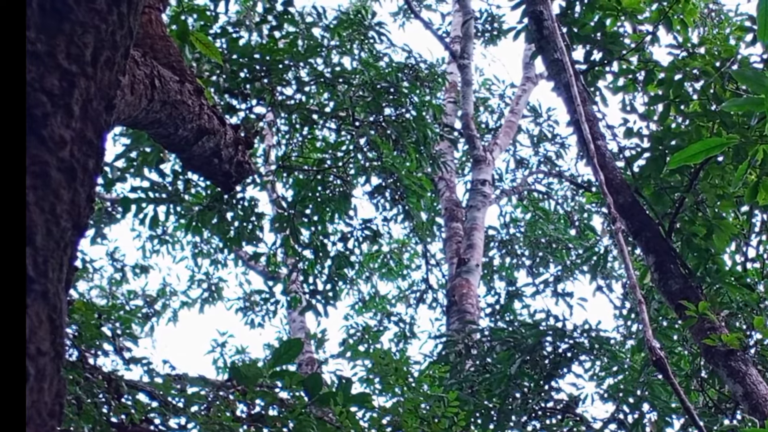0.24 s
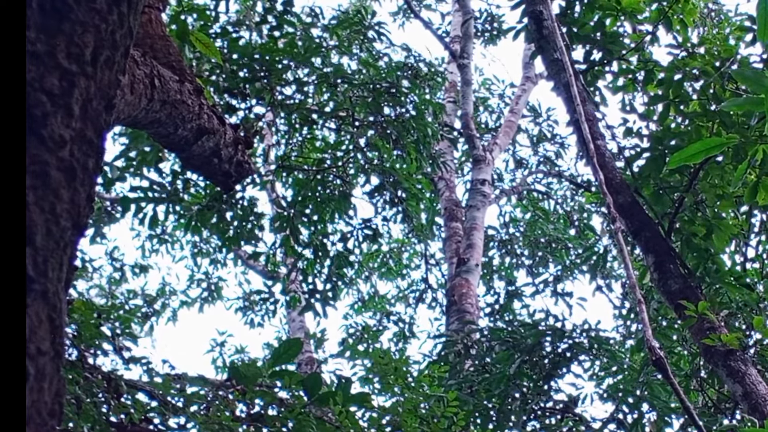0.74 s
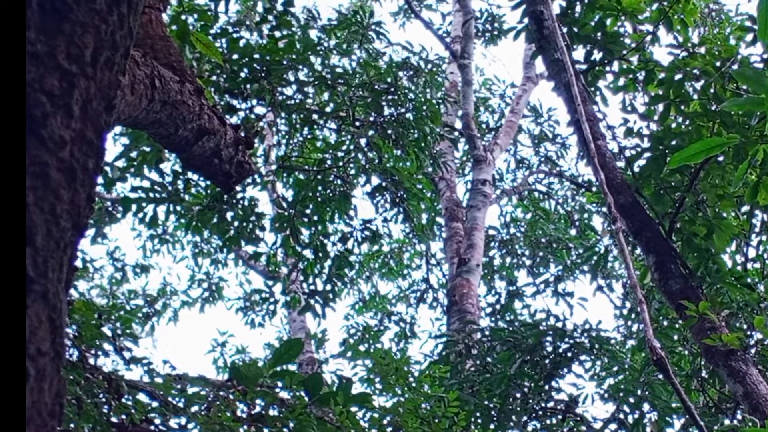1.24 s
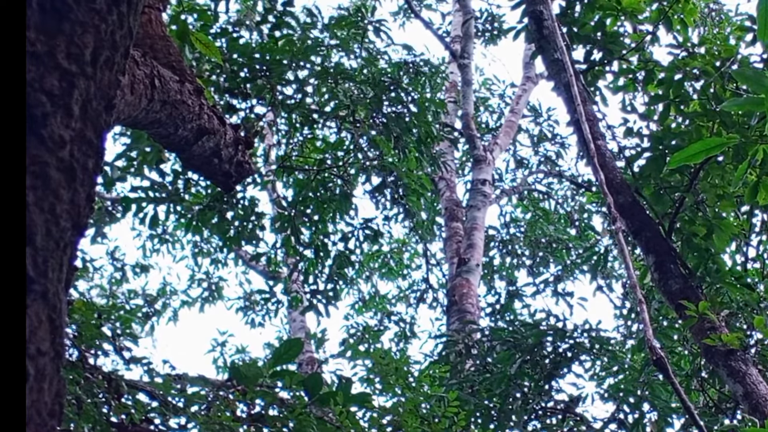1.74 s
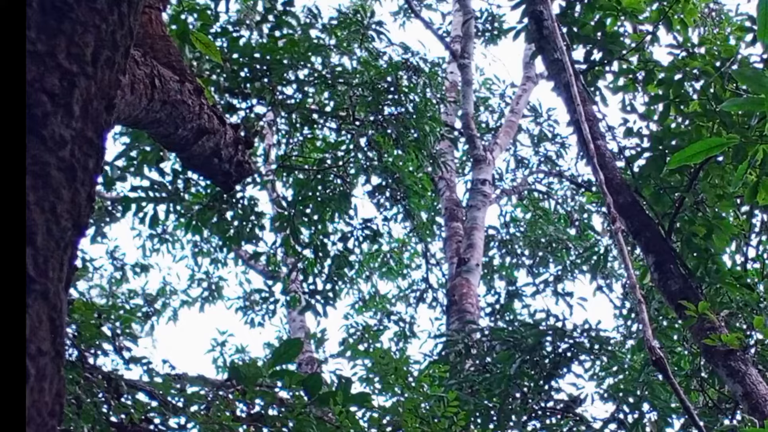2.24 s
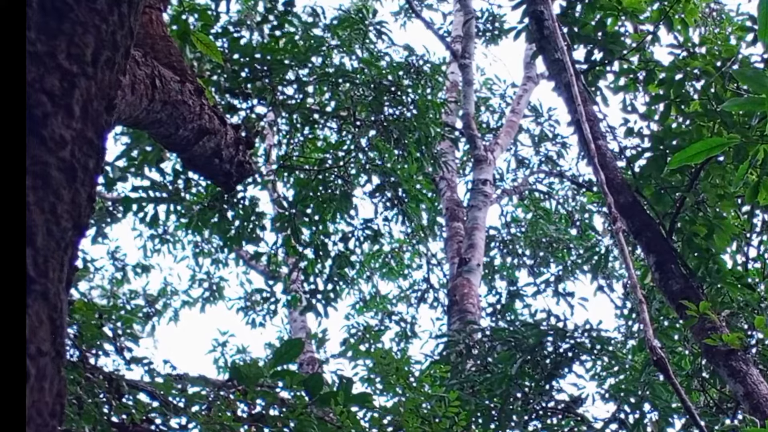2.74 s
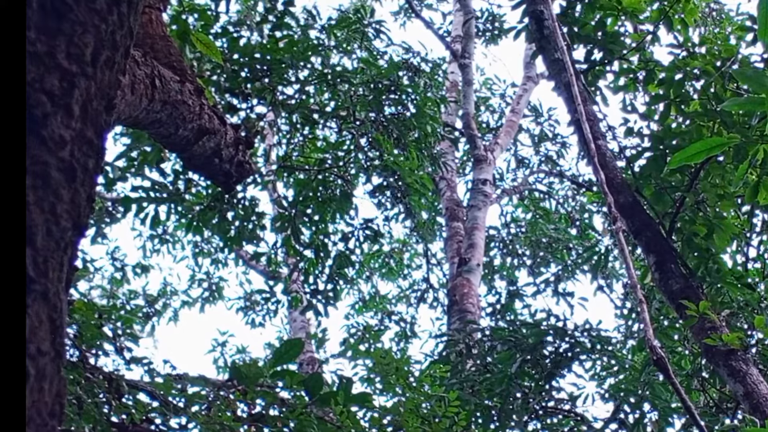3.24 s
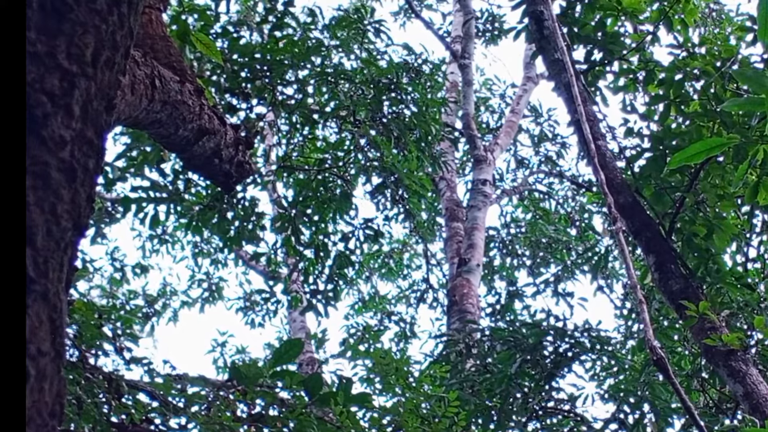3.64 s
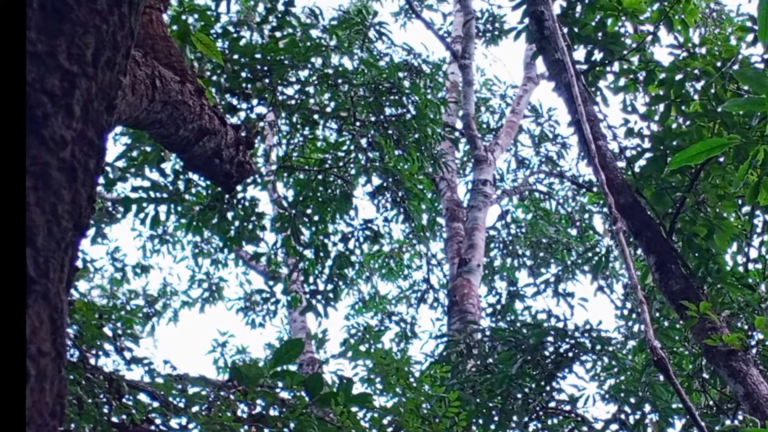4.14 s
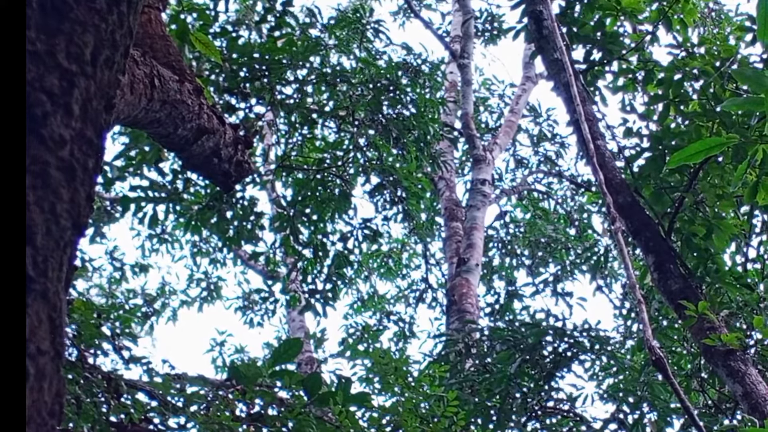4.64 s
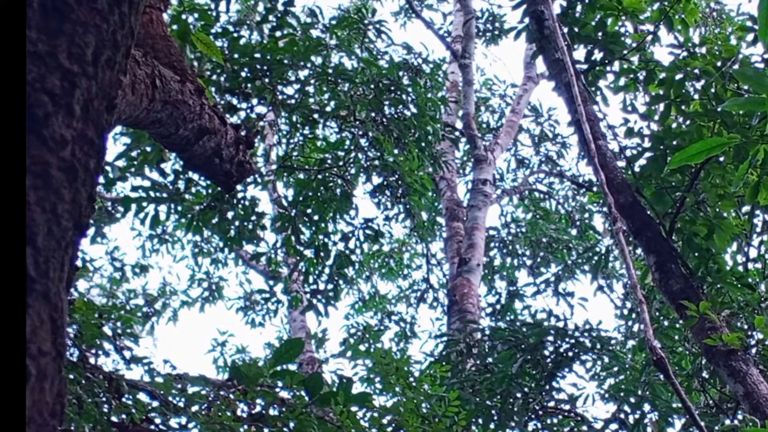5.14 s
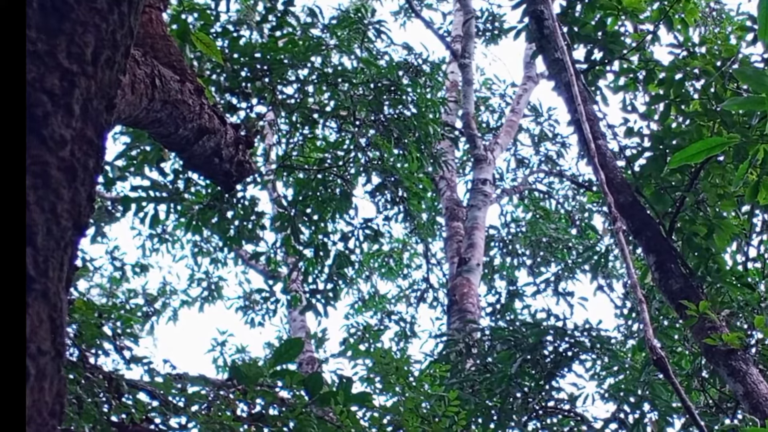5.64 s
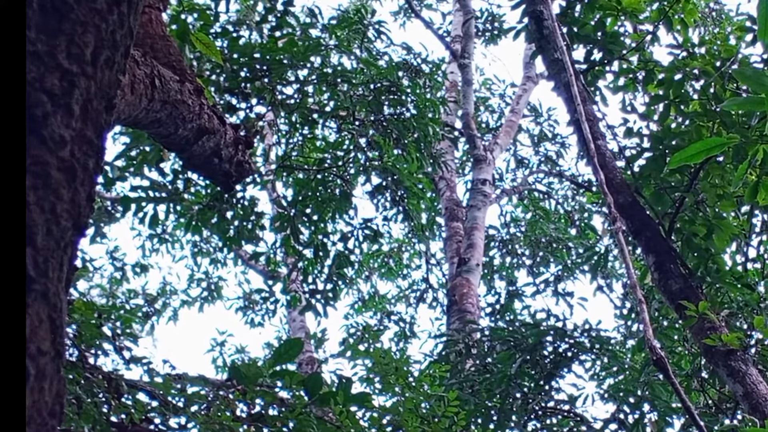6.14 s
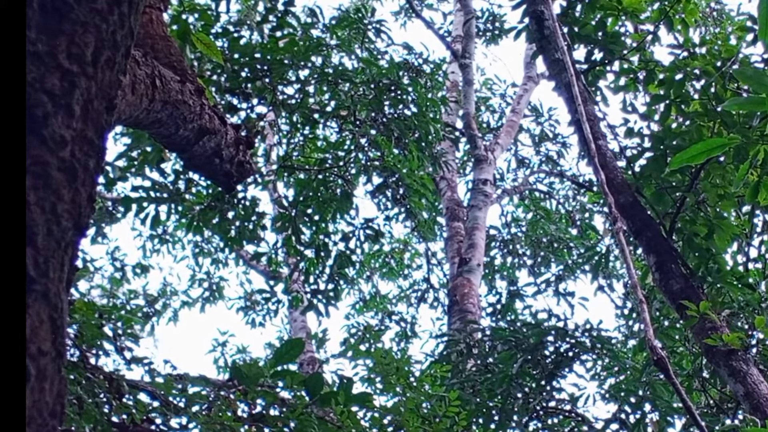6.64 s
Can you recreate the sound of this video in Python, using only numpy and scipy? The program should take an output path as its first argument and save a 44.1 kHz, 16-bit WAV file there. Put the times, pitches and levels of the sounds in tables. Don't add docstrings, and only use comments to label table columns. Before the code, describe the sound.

A daytime forest with a constant cicada shimmer and pulsing crickets near 4-5 kHz, over soft air hiss. At 0.1 s a near bird whistles upward to about 2 kHz, sings a smooth arched note around 0.35-0.6 s with small answers, and whistles again at 0.75 s. Soft falling chirps, fourteen per second, start at 0.6 s, fainter at 1.1 s, loud from 1.5 to 2 s, with twig ticks and leaf crackles near 1.8-2.1 s. Short peaked calls at 2.5 s and a high zip at 3 s follow. Chirps return 3.6-4.2 s; a branch creaks and snaps sharply at 4.13-4.2 s. A rough, fast trill sounds 4.45-4.7 s. Dull drip knocks come around 5 s, faint swoops and far pips after, and a long slowing chirp bout 5.9-6.4 s with a faint rasp. Calls leave a diffuse woodland tail.

```python
import sys
import numpy as np
from scipy import signal
from scipy.io import wavfile
from scipy.ndimage import uniform_filter1d

SR = 44100
rng = np.random.default_rng(int(sys.argv[2]) if len(sys.argv) > 2 else 0)


def amplitude_ratio(level_db):
    exponent = np.asarray(level_db, float) / 20
    return 10 ** exponent


def generate_wav(signal):
    frames = np.transpose(np.atleast_2d(signal))
    scaled = np.clip(frames, -1, 1) * 32767
    pcm = np.round(scaled).astype(np.int16)
    wavfile.write(sys.argv[1], SR, pcm)


N = 304290
LEAD = SR // 4

# (share of length [0-1], pitch against top [ratio], level [dB])
ARCH_SHAPE = [(0, .865, -13), (.1, .92, -4), (.18, .96, -4.5), (.31, 0.98, 1), (.48, 1., -2),
              (.62, 0.98, 0), (.74, 0.94, -2), (.96, .86, -2.5), (1, 0.85, -22)]
DROP_SHAPE = [(0, 0.98, 16), (.35, .6, -4.5), (1, 0.322, -16.5)]
LIFT_SHAPE = [(0, 0.922, -5), (.6, 1., -2.5), (1, 1., -2)]
STEP_SHAPE = [(0, .945, 2), (.28, 0.96, -6), (.65, .99, 4), (.75, .995, -8), (.86, 1., 8), (1, 1.01, 8)]
HOOK_SHAPE = [(0, 0.678, 9.5), (.28, .92, -4), (.55, 1., -5.5), (.75, .93, -9), (1, 0.67, -8)]
PEAK_SHAPE = [(0, .89, -13), (.45, .93, -3), (.7, 1., 0.), (1, 0.79, 4.5)]
FLICK_SHAPE = [(0, .65, 3), (.4, .79, -9.5), (1, 0.96, -8.5)]
SWOOP_SHAPE = [(0, 0.95, -5.5), (.32, .865, 0), (.62, .735, -5), (1, .69, -15)]
ZIP_SHAPE = [(0, .68, -10.5), (.32, 0.96, 0), (.6, 1., -6.5), (1, 0.94, -34)]
SLIDE_SHAPE = [(0, 0.98, 0.), (.5, .89, -0.83), (1, .78, -2)]
FLAT_SHAPE = [(0, 1.005, -4), (.4, .995, -3.5), (1, 1., -3)]
HUMP_SHAPE = [(0, .84, -8), (.36, 0.91, 0.5), (.62, 1, -1.5), (1, 0.91, -9)]
PIP_SHAPE = [(0, 0.866, -10), (.25, 0.98, -2.5), (.5, .92, -1), (.75, .76, -3), (1, 0.53, -11)]
# (start [s], length [s], top pitch [Hz], level [dB])
ARCHES = [
    (-.28, 0.24, 1574, -41),
    (.345, .27, 1579, -39.5),
]
DROPS = [
    (.163, 0.0198, 1994, -50.5),
    (0.807, 0.0189, 2060, -47.5),
]
LIFTS = [
    (4.449, 0.0182, 2120, -46),
]
STEPS = [
    (2.502, .098, 2104, -54.5),
]
HOOKS = [
    (1.748, 0.028, 2970, -47.5),
    (1.936, 0.028, 3100, -51),
    (4.477, 0.018, 3070, -50),
]
PEAKS = [
    (2.566, .046, 2615, -47.5),
]
FLICKS = [
    (.163, 0.011, 3430, -48),
    (.472, 0.0075, 3050, -41),
    (.628, 0.013, 3320, -47),
    (.806, 0.0116, 3117, -41),
    (.86, 0.042, 3040, -53),
]
CLIMBS = [
    (4.46, .04, 7600, -49.5),
]
SWOOPS = [
    (2.06, 0.29, 4010, -69.5),
    (3.109, 0.22, 4186, -56.5),
    (5.16, .2, 4090, -56),
    (6.6, 0.16, 4104, -56),
]
ZIPS = [
    (2.966, .06, 7783, -44.5),
    (5.59, .065, 7560, -45),
]
SLIDES = [
    (4.29, .08, 6990, -57.5),
    (6.862, .07, 6950, -59.5),
]
FLATS = [
    (3.66, 0.145, 1135, -69.5),
    (3.825, 0.073, 1155, -63.5),
    (6.835, 0.061, 1175, -65),
    (2.59, 0.071, 10400, -69),
]
HUMPS = [
    (6.651, 0.13, 1220, -64),
]
# (end [s], length [s], top pitch [Hz], climb in last 0.1 s [Hz], level [dB])
WHISTLES = [
    (.164, 0.097, 2025, 421, -33),
    (.812, .1, 2017, 389.5, -34),
]
ANSWERS = [
    (.472, 0.062, 2048, 940, -44),
    (.628, 0.064, 2018, 830, -46),
    (4.443, 0.0243, 1920, 1500, -58.5),
]
LEAD_INS = [
    (1.748, .082, 1990, 704, -51.5),
    (1.933, .085, 2033, 656, -49),
]
# (climb bend [exponent], swell [dB], swell bend [exponent])
FIRM = (1.8, -24, 4.9)
EAGER = (1.8, -26, 9.3)
QUICK = (2.91, -16, 4.4)
SHY = (2.3, -25, 2.8)
# (time [s], top pitch [Hz], dive depth [Hz], level [dB])
TRILL = [(4.485, 3335, 1530, -50), (4.5, 3335, 2016, -39.5), (4.53, 3326, 2149, -37.5),
         (4.56, 3180, 2058, -38.5), (4.6, 3128, 1961, -38), (4.65, 3085, 2060, -38),
         (4.68, 2993, 2084, -43.5), (4.7, 2930, 2010, -47)]
# (frequency [Hz], gain [dB])
TRILL_COLOUR = [(1000, -20), (1500, -5.5), (2000, 2.5), (2300, -5), (2650, 2.5), (3050, -7.5), (3400, -14)]
# (frequency [Hz], level [dB])
OVERTONES = [(2500, -21), (5000, -65), (6300, -30), (7300, -16.5), (8300, -34.5), (9500, -35), (11300, -41),
             (13000, -38), (15500, -51)]
ARCH_OVERTONES = [(2500, -21.5), (5000, -30), (6300, -33), (7500, -10), (9300, -32), (11000, -23),
                  (12600, -28), (14000, -42)]
TRILL_OVERTONES = [(3000, -37.5), (5500, -24), (6800, -30), (8400, -9), (9900, -19.5), (11300, -8),
                   (13000, -52), (15500, -30)]
CHIRP_OVERTONES = [(6500, -38), (8500, -35), (10500, -28), (12000, -36), (13500, -43), (15500, -55)]
# (first [s], last [s], full level [dB], opening under full [dB], slowing [s])
CHIRP_BOUTS = [
    (0.622, 0.915, -46.5, -2, 0.),
    (1.115, 1.456, -51, 0, 0.0008),
    (1.5284, 1.956, -37.5, -4, 0.0029),
    (3.57, 3.716, -45.5, -7, 0),
    (3.789, 4.2174, -38, -1, .0033),
    (5.927, 6.424, -39.5, -7, 0.0088),
    (6.572, 6.752, -52, 1, 0.0093),
]
# (time [s], pitch [Hz], level [dB])
CHIRP = [(-.013, 4453, -4.5), (-.009, 4182, -5.5), (-.003, 3998, 0), (.0005, 3800, 1), (.006, 3400, -16)]
# (first [s], last [s], pips [count], length [s], first pitch [Hz], last pitch [Hz])
PIP_RUNS = [
    (5.606, 5.742, 6, .016, 2230, 2100),
    (6.042, 6.266, 8, .028, 2280, 2120),
]
# (level [dB]), (fade [dB])
PIP_DB = [-63.5, -60.5]
PIP_FADE_DB = [-5, -6]
# (time [s], peak above 6 kHz [dB], peak at 1-3 kHz [dB])
TICKS = [(1.316, -51, -62), (1.509, -65, -49), (1.52, -58, -45), (1.531, -70, -52), (1.775, -40, -39.5),
         (1.9752, -31, -39.5), (2.0408, -37, -37.5), (2.235, -56, -58), (2.804, -64, -45),
         (3.0843, -51, -52.5), (3.194, -50, -75), (3.631, -56, -52.5), (3.785, -50.5, -73),
         (3.796, -77, -52), (4.1315, -18, -50), (4.1897, -28, -68.5), (4.475, -47, -49), (4.947, -67, -53),
         (5.005, -69, -47.5), (5.3907, -58, -48.5), (5.4801, -39.5, -59), (5.65, -52, -57),
         (5.864, -50, -69.5), (6.048, -55, -57.5), (6.118, -55, -76), (6.4163, -50, -79), (5.957, -48, -54),
         (6.36, -70, -51)]
# (frequency [Hz], width [Hz], level [dB])
SNAP = [(5100, 810, -3), (7900, 5000, -5.5), (10500, 2840, 4), (13300, 1700, -32)]
# (time [s], peak [dB], ring [Hz])
CRACKLES = [(1.0171, -56, 10700), (1.907, -50, 11200), (2.0405, -36.5, 10900), (2.613, -42.5, 8900),
            (4.455, -60, 11500), (4.475, -47, 10800), (4.868, -60, 11900), (4.947, -58, 10500),
            (1.783, -50, 11000), (1.787, -46, 8920), (1.796, -50, 11000), (1.8, -44, 6840),
            (1.8, -50, 11500), (1.807, -47, 10900), (1.812, -53, 11500), (2.075, -61, 10000),
            (2.238, -54, 10500), (2.242, -56, 11200), (2.246, -62, 10500), (2.2775, -56, 11000),
            (2.523, -61, 9000), (2.592, -61, 11000), (4.209, -43, 10000), (4.2145, -41, 10000),
            (4.2167, -43, 9500), (4.229, -49, 8700), (4.236, -51, 11500), (5.505, -63, 11000),
            (5.669, -58, 10500), (5.696, -57, 10800), (5.8355, -56, 10600), (6.039, -59, 11600),
            (6.187, -59, 8630), (6.374, -58, 8620), (6.474, -59.5, 11180), (6.798, -62, 9130)]
# (time [s], slip rate [1/s], level [dB])
CREAK = [(4.13, 196, -37), (4.145, 254, -35.5), (4.155, 218, -45), (4.162, 280, -41), (4.167, 316, -38),
         (4.178, 290, -45), (4.186, 250, -51)]
# (time [s], peak [dB], ring [Hz])
KNOCKS = [
    (2.053, -54, 330),
    (3.083, -50, 393),
    (3.629, -48, 397),
    (3.789, -54, 382),
    (4.141, -68, 253),
    (4.942, -48, 155),
    (5.003, -45, 158),
    (5.391, -46.5, 160.7),
    (6.036, -47, 382),
]
# (start [s], end [s], first stroke [s], level [dB])
CRICKET_LOW = [
    (0.335, 1.537, 0.39, -55),
    (3.556, 4.837, 3.569, -55.5),
    (6.584, 6.95, 6.6, -55.5),
]
# (start [s], loudest [s], level [dB])
CRICKET_HIGH = [
    (-0.5, 1, -59.5),
    (0.75, 0.2, -56),
    (0.9, 1, -59.5),
    (3, 3.4, -56.5),
    (4.15, 4, -55),
    (4.5, 7, -56.5),
    (6.66, 7.5, -60.5),
]
# (time [s], strokes so far [count])
BEATS = [(0.0, -0.48), (1.0, 16.65), (3.0, 53.15), (3.75, 66.72), (4.05, 71.6), (4.2, 74.76), (4.5, 80.17),
         (5.1, 90.85), (5.4, 96.55), (6.9, 123.88)]
# (frequency [Hz], width [Hz], level [dB])
THIN_LINES = [(5062, 256, -64.5), (4590, 190, -79), (5400, 56, -81), (8700, 69, -85), (10500, 25, -101)]
# (time [s], level [dB])
CHORUS = [(0.0, -55.5), (0.69, -49), (1.31, -57.5), (1.58, -62), (1.81, -55), (2.71, -54), (3.9, -55),
          (4.38, -55.5), (4.59, -51.5), (4.84, -55.5), (5.23, -53.5), (5.44, -59), (5.77, -55.5),
          (6.55, -51), (6.9, -51.5)]
# (frequency [Hz], density [dB per Hz])
AIR = [(25, -11), (50, -13), (90, 1), (200, -0.5), (500, -4.5), (1000, -8.5), (2500, -10), (3300, -7.5),
       (5600, -14.5), (7000, -17.5), (11500, -20.5), (13500, -29.5), (16000, -34)]
# (frequency [Hz], t60 [s])
FOREST = [(500, 0.11), (2000, 0.78), (4000, 0.97), (8000, 0.53), (14000, 0.51)]


def silence():
    return np.zeros(N + LEAD)


def clock():
    return (np.arange(N + LEAD) - LEAD) / SR


def evened(x):
    return x / np.sqrt(np.mean(x ** 2) + 1e-20)


def read(points, hz):
    f, value = np.transpose(points)
    return np.interp(np.log(hz + 1), np.log(f + 1), value)


def curves(rows):
    s, *columns = np.transpose(rows)
    t = np.arange(s[0], s[-1], 1 / SR)
    return [t] + [np.interp(t, s, c) for c in columns]


def add(mix, s, sound):
    part = mix[max(round(s * SR) + LEAD, 0):][:len(sound)]
    part += sound[:len(part)]


def smooth(x, span):
    return uniform_filter1d(uniform_filter1d(x, int(span)), int(span))


def wander(size, span):
    return evened(smooth(rng.standard_normal(size), span))


def butter(x, order, hz, kind):
    return signal.sosfilt(signal.butter(order, hz, kind, fs=SR, output="sos"), x)


def resonate(x, hz, width_hz):
    r = np.exp(-np.pi * width_hz / SR)
    return 2 * signal.lfilter([1 - r], [1, -r * np.exp(2j * np.pi * hz / SR)], x).real


def resonate_twice(x, hz, width_hz):
    return resonate(resonate(x, hz, width_hz), hz, width_hz)


def hiss_bands(bands):
    hiss = rng.standard_normal(N + LEAD)
    return sum(amplitude_ratio(db) * evened(resonate_twice(hiss, hz, width_hz)) for hz, width_hz, db in bands)


def voice(hz, level_db, overtones, effort=0., edge_s=0.0013, grain=70):
    turn = 2 * np.pi * np.cumsum(hz) / SR
    rough = .6 + wander(len(hz), grain) * min(70 / grain, 1) ** .5
    above = 0
    for k in range(2, 10):
        above = above + amplitude_ratio(read(overtones, k * hz)) * (k * hz < 16000) * np.sin(k * turn)
    tone = np.sin(turn) + above * rough * amplitude_ratio(effort * (level_db + 26.0))
    count = np.arange(len(hz))
    ends = np.minimum(count, count[::-1]) / (edge_s * SR)
    return np.sqrt(2) * amplitude_ratio(level_db) * tone * np.minimum(ends, 1)


def sing(notes, overtones, effort, grain=70):
    out = silence()
    for rows in notes:
        t, hz, level_db = curves(rows)
        add(out, t[0], voice(hz, level_db, overtones, effort, grain=grain))
    return out


def calls(shape, rows):
    return [[(s + share * length, hz * ratio, db + under_db) for share, ratio, under_db in shape]
            for s, length, hz, db in rows]


def whistles(rows, climb_bend, swell_db, swell_bend):
    left = np.linspace(1, 0, num=16)
    tire_db = -2.5 * (1 - left) ** 4
    notes = []
    for end, length, top_hz, climb_hz, db in rows:
        hz = top_hz - climb_hz * (left * length * 10) ** climb_bend
        level_db = db + swell_db * left ** swell_bend + tire_db
        notes.append(np.transpose([end - left * length, hz, level_db]))
    return notes


def branches(x, early_db, t60_s, gap_s=.002, low_hz=300, high_hz=15000):
    t = np.arange(SR // 8) / SR
    sparse = rng.standard_normal(len(t)) * (rng.random(len(t)) < 900 / SR)
    taps = sparse * amplitude_ratio(-60 * t / t60_s) * (t > gap_s)
    thin = butter(x, 2, [low_hz, high_hz], "band")
    return x + amplitude_ratio(early_db) * signal.oaconvolve(thin, taps / np.linalg.norm(taps))[:len(x)]


def near_whistler():
    notes = whistles(WHISTLES[:1], *FIRM) + whistles(WHISTLES[1:], *EAGER) + whistles(ANSWERS, *QUICK)
    notes += calls(DROP_SHAPE, DROPS) + calls(LIFT_SHAPE, LIFTS)
    near = branches(sing(notes, OVERTONES, 0.41, 117), -5.5, 0.21)
    return branches(near, 3.6, 0.33, .002, 6300, 14500)


def arched_whistler():
    arch = branches(sing(calls(ARCH_SHAPE, ARCHES), ARCH_OVERTONES, 0.23, 210), -11.5, 0.16)
    return branches(arch, 2.6, 0.34, .002, 5700, 13000)


def hidden_whistler():
    notes = whistles(LEAD_INS, *SHY) + calls(STEP_SHAPE, STEPS) + calls(HOOK_SHAPE, HOOKS)
    notes += calls(PEAK_SHAPE, PEAKS)
    return amplitude_ratio(-3) * branches(sing(notes, OVERTONES, 0.3), -6.5, 0.18)


def trill_voice():
    out = silence()
    t, top_hz, dive_hz, level_db = curves(TRILL)
    turn = 2 * np.pi * (27.6 * (t - t[0]) + .43)
    dive = np.cos((turn + .5 * np.cos(turn)) / 2) ** 2
    quiver = 0.117 * np.cos(3 * turn + 0.82 * wander(len(t), 272))
    hz = top_hz * (1 + 0.0252 * wander(len(t), 206)) - dive_hz * np.clip(dive + quiver, 0, 1.05)
    level_db = level_db + read(TRILL_COLOUR, hz * 0.98) + 1.7 * wander(len(t), 48)
    add(out, t[0], voice(hz, level_db, TRILL_OVERTONES, 0.051))
    return out


def trilling_bird():
    beak_s, beak_opens_s = 4.5, 0.11
    throat_hz, throat_width_hz, throat_db = 2620, 310, 7.5
    trill = branches(trill_voice(), 4.6, 0.24, .002, 1750, 7500)
    trill = branches(trill, 7.5, 0.19, .001, 7500, 13000)
    beak = np.clip((clock() - beak_s) / beak_opens_s, 0, 1)
    return amplitude_ratio(-8.0) * (trill + amplitude_ratio(throat_db) * beak * resonate(trill, throat_hz, throat_width_hz))


def chirp_times():
    gap_s, opening_s = .0714, 0.11
    rows = []
    for first, last, db, opening_db, slowing_s in CHIRP_BOUTS:
        s = np.linspace(first, last, num=round((last - first) / gap_s) + 1)
        s = s - slowing_s * np.sin(np.pi * (s - first) / (last - first))
        rows += zip(s, db + opening_db * np.clip(1 - (s - first) / opening_s, 0, 1))
    return rows


def chirping_bird():
    out = silence()
    t, hz, shape_db = curves(CHIRP)
    for (s, db), (pitch, beat) in zip(chirp_times(), rng.random((60, 2))):
        flutter = 1 + 0.41 * np.cos(2 * np.pi * (430 * t + beat)) * np.clip(-t / 0.0016, 0, 1)
        note = voice(hz * (.99 + .02 * pitch), db + shape_db - 5.0, CHIRP_OVERTONES, -0.24, 0.0014)
        add(out, s + t[0], flutter * note)
    return branches(out, -6.5, 0.087, .011)


def low_birds():
    return sing(calls(FLAT_SHAPE, FLATS) + calls(HUMP_SHAPE, HUMPS), OVERTONES, .8)


def far_birds():
    notes = calls(FLICK_SHAPE, FLICKS + CLIMBS) + calls(SWOOP_SHAPE, SWOOPS)
    notes += calls(ZIP_SHAPE, ZIPS) + calls(SLIDE_SHAPE, SLIDES)
    return sing(notes, OVERTONES, 1.0)


def far_trill():
    slip_s, slip_db, slip_hz = .002, 1.5, 50
    rows = []
    for run, db, fade_db in zip(PIP_RUNS, PIP_DB, PIP_FADE_DB):
        first, last, count, length, first_hz, last_hz = run
        share = np.linspace(0, 1, num=count)
        late, lean, loud = rng.standard_normal((count, 3)).T
        s = first + (last - first) * share + slip_s * late
        hz = first_hz + (last_hz - first_hz) * share + slip_hz * lean
        level_db = db + fade_db * (2 * share - .8) ** 2 + slip_db * loud
        rows += zip(s, length + 0 * share, hz, level_db)
    return branches(sing(calls(PIP_SHAPE, rows), TRILL_OVERTONES, 0.46), 0.5, 0.14)


def splinters(events):
    high, middle = np.zeros((len(SNAP), N + LEAD)), silence()
    t = np.arange(300) / SR
    for s, high_db, middle_db in events:
        burst = 0.25 * rng.standard_normal(300) * amplitude_ratio(-60 * t / 0.0064) + (t == 0)
        for band, lean in zip(high, rng.standard_normal(len(SNAP))):
            add(band, s, amplitude_ratio(high_db + 1.1 * lean) * burst)
        add(middle, s, amplitude_ratio(middle_db) * burst)
    snap = sum(amplitude_ratio(db + 10) * resonate_twice(band, hz, w) for band, (hz, w, db) in zip(high, SNAP))
    snap = butter(snap, 3, 13000, "low")
    body = resonate(resonate(middle, 1900, 1620), 1770, 2000)
    return snap + amplitude_ratio(20.0) * butter(body, 2, 1100, "high")


def creak():
    out = silence()
    t, per_s, slip_db = curves(CREAK)
    slipped = np.diff(np.floor(np.cumsum(per_s) / SR), prepend=0) > 0
    flex = np.sin(np.pi * (t - t[0]) / (t[-1] - t[0])) ** 0.42
    push = slipped * flex
    hum = resonate(push, 240, 85) + 0.46 * resonate(push, 590, 500)
    add(out, t[0], amplitude_ratio(-55) * evened(hum))
    return out + splinters([(s, db, db - 9.5) for s, db in zip(t[slipped], slip_db[slipped])])


def crackles():
    out, t = silence(), np.arange(400) / SR
    for (s, db, hz), noise in zip(CRACKLES, rng.standard_normal((60, 400))):
        burst = 0.22 * noise * amplitude_ratio(-60 * t / 0.017) + (t == 0)
        ring = resonate_twice(burst, hz, 2600)
        add(out, s, amplitude_ratio(db) * ring / abs(ring).max())
    return out


def knocks():
    out, t = silence(), np.arange(2000) / SR
    for s, db, hz in KNOCKS:
        add(out, s, amplitude_ratio(db - 60 * t / 0.027) * np.sin(2 * np.pi * hz * t + 1.7))
    return out


def cricket(t, level_db, strokes, hz, duty, fuzz, soft):
    gate = smooth(1. * (strokes % 1 < duty), soft)
    droop_hz = 60.2 * (strokes % 1 / duty - .5)
    turn = 2 * np.pi * np.cumsum((hz - droop_hz) * (1 + fuzz * wander(len(t), 110.0))) / SR
    out = silence()
    add(out, t[0], amplitude_ratio(level_db) * evened(gate * (np.sin(turn) + amplitude_ratio(-32) * np.sin(2 * turn))))
    return out


def low_cricket():
    edge_s, edge_db = 0.03, -7
    warm_hz, warm_s = 63.8, 0.0756
    out = silence()
    for start, end, first_s, db in CRICKET_LOW:
        t = np.arange(start, end, 1 / SR)
        level_db = db + edge_db * np.clip(1 - np.minimum(t - start, end - t) / edge_s, 0, 1)
        hz = 4640 - warm_hz * (t < start + warm_s)
        out += cricket(t, level_db, 26.7 * (t - first_s), hz, 0.49, 0.003, 130)
    return out


def phrases(t):
    hush_db, wake_db, sag_db = -25, -7.5, -4
    wake_s, rest_s = 0.11, 0.46
    rows = []
    for (start, top, db), (end, *_) in zip(CRICKET_HIGH, CRICKET_HIGH[1:] + [(8,)]):
        rows += [(start, db + hush_db), (start + wake_s, db + wake_db)]
        rows += [(top, db), (end - rest_s, db + sag_db)]
    return np.interp(t, *np.transpose(rows))


def high_crickets():
    t, strokes = curves(BEATS)
    n = len(t)
    strokes = strokes + 0.23 + 0.014 * wander(n, 2800)
    level_db = phrases(t) - 4.5
    out = cricket(t, level_db + 0.63 * wander(n, 1500), strokes, 5125, 0.5, 0.003, 200)
    out += cricket(t, level_db - 11 + 2.4 * wander(n, 8700), 1.1 * strokes + .5, 5090, 0.62, 0.0054, 200)
    far_strokes = 1.4 * strokes + .06 * wander(n, 4000)
    return out + cricket(t, -80 + 2.8 * wander(n, 9000), far_strokes, 5440, 0.39, 0.00397, 300)


def chorus():
    t, level_db = curves(CHORUS)
    out, ring_s = np.zeros(N), np.arange(500) / SR
    shape = ring_s / .0025 * np.exp(-ring_s / 0.0017)
    for hz in np.linspace(3650, 4620, num=11):
        clicks = (rng.random(N) < 260 / SR) * amplitude_ratio(1.07 * rng.exponential(1, N))
        clicks = clicks * amplitude_ratio(0.5 * wander(N, 3100))
        ring = shape * np.sin(2 * np.pi * hz * ring_s)
        out += amplitude_ratio(-6 * ((hz - 4250) / 600) ** 2) * signal.oaconvolve(clicks, ring)[:N]
    return evened(out) * amplitude_ratio(np.resize(level_db, N) - 2.0)


def katydid():
    t = clock()
    bursts = uniform_filter1d(1. * ((14.3 * (t - 6.185)) % 1 < .4), 300) * np.clip((t - 5.9) / 0.2, 0, 1)
    return bursts * hiss_bands([(13400, 1100, -84), (8700, 600, -78.0)])


def air():
    a, b, patches = rng.standard_normal((N // 256 + 5, 513, 3)).T
    patches = evened(uniform_filter1d(uniform_filter1d(patches, 14, 0), 10, 1))
    colour_db = read(AIR, np.fft.rfftfreq(1024, 1 / SR))[:, None]
    z = (a + 1j * b) * amplitude_ratio(colour_db + 1.15 * patches)
    return amplitude_ratio(-64) * evened(signal.istft(z, nperseg=1024, noverlap=768)[1][:N])


def forest(x, gap_s):
    taps, at = np.zeros(3 * SR // 2), np.arange(int(gap_s * SR), SR, 20)
    taps[at + rng.integers(0, 20, len(at))] = rng.choice([-1., 1.], len(at))
    hz, t, z = signal.stft(taps, SR, nperseg=256)
    tail = signal.istft(z * amplitude_ratio(-60 * t / read(FOREST, hz)[:, None]), SR, nperseg=256)[1]
    return signal.fftconvolve(x, tail / np.linalg.norm(tail))[:len(x)]


def scene():
    near, arch, hidden = near_whistler(), arched_whistler(), hidden_whistler()
    trill, falling, low = trilling_bird(), chirping_bird(), low_birds()
    far, pips = far_birds(), far_trill()
    close = splinters(TICKS) + creak() + crackles() + knocks()
    crickets = low_cricket() + high_crickets()

    sent = amplitude_ratio(-6.5) * near + amplitude_ratio(-6.5) * arch + amplitude_ratio(-4.0) * hidden
    sent += amplitude_ratio(-10.5) * trill + amplitude_ratio(-13.5) * falling + amplitude_ratio(-7.0) * low
    sent += amplitude_ratio(-14) * pips + amplitude_ratio(-19.0) * close + amplitude_ratio(-12) * crickets
    wet = forest(sent, .004) + amplitude_ratio(0.5) * forest(far, .002)

    mix = near + arch + hidden + trill + falling + low + amplitude_ratio(-8.0) * far + pips
    mix += close + crickets + hiss_bands(THIN_LINES) + katydid() + wet
    return (mix[LEAD:] + chorus() + air())[None]


def low_pass(x):
    return signal.sosfilt(signal.butter(12, 15850, fs=SR, output="sos"), x)


def record(dry):
    cut = butter(dry, 3, 55, "high")
    return low_pass(cut)


dry = scene()
out = record(dry)
generate_wav(out)
```